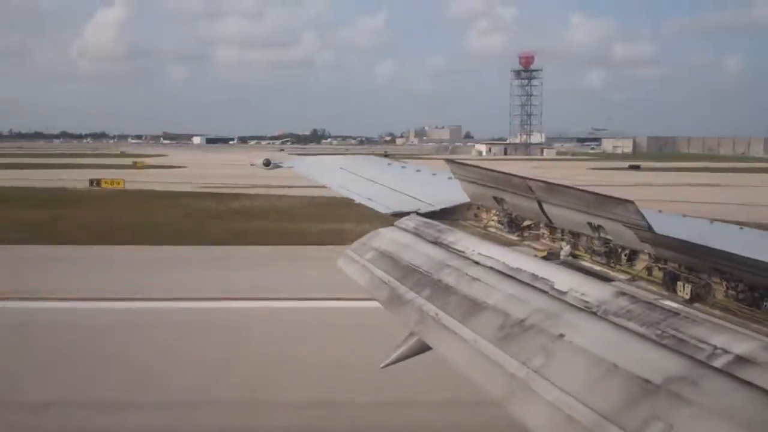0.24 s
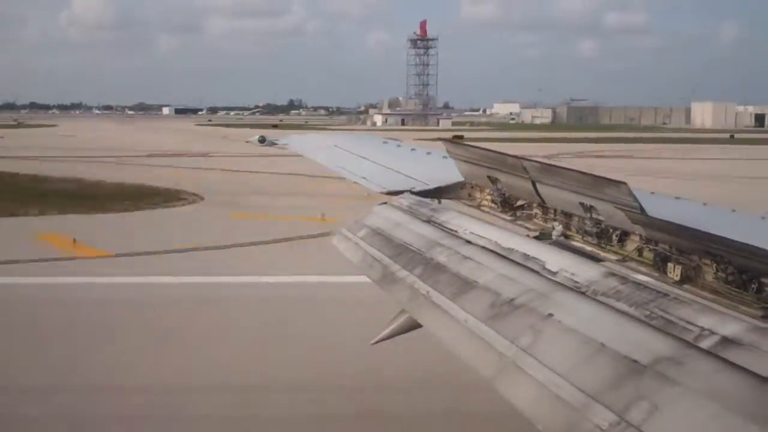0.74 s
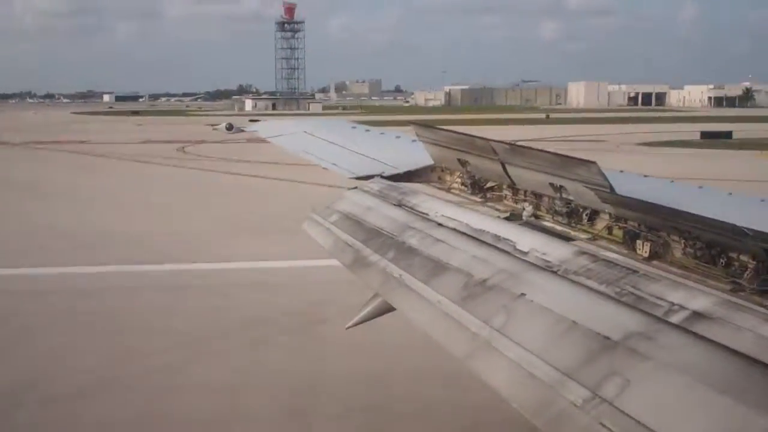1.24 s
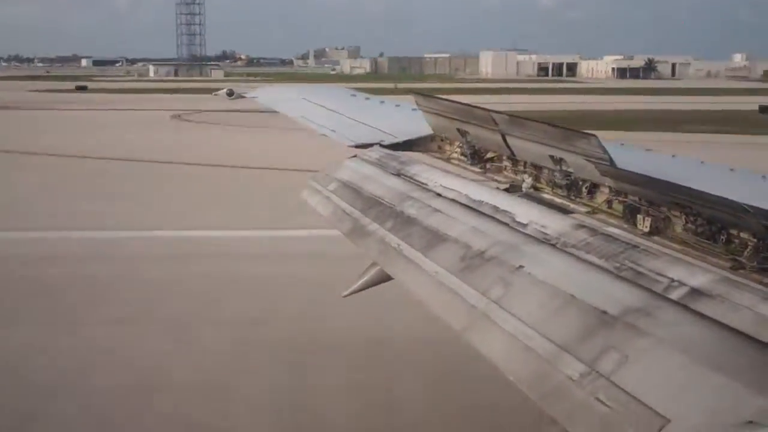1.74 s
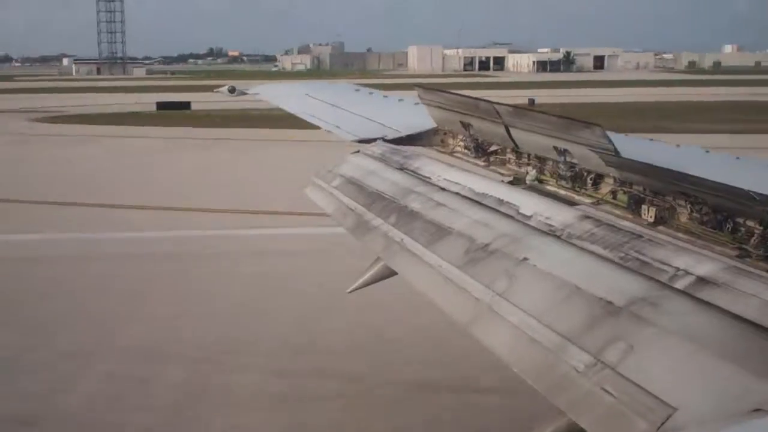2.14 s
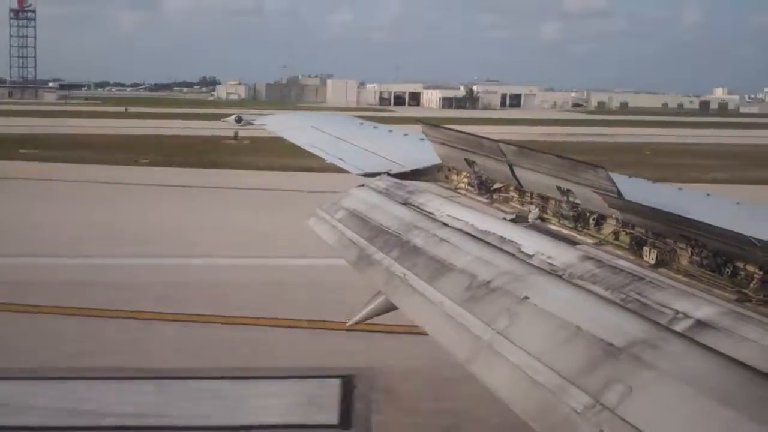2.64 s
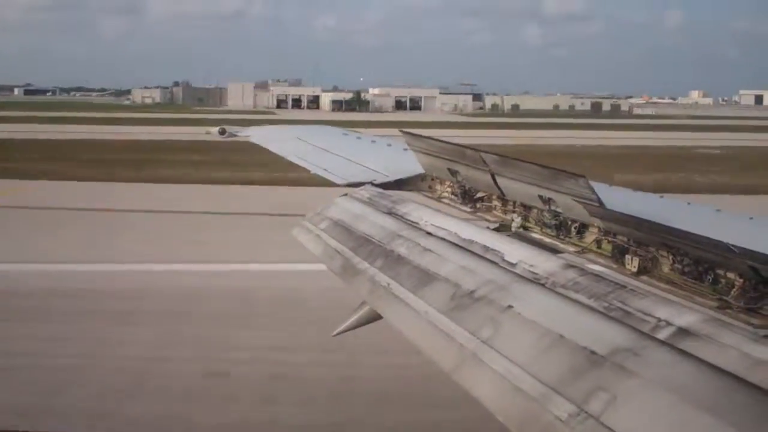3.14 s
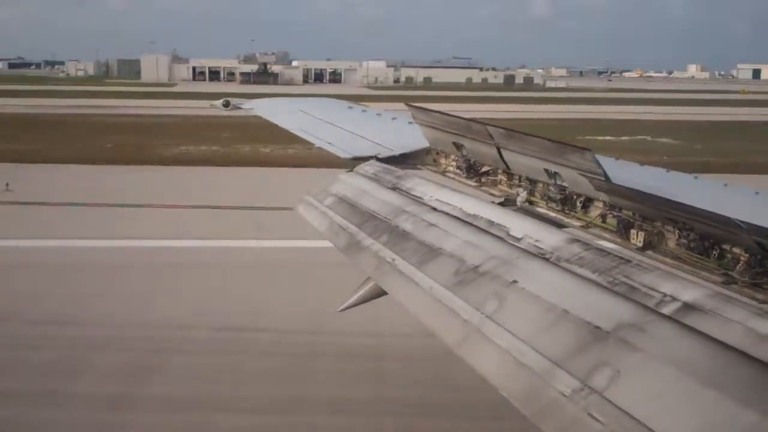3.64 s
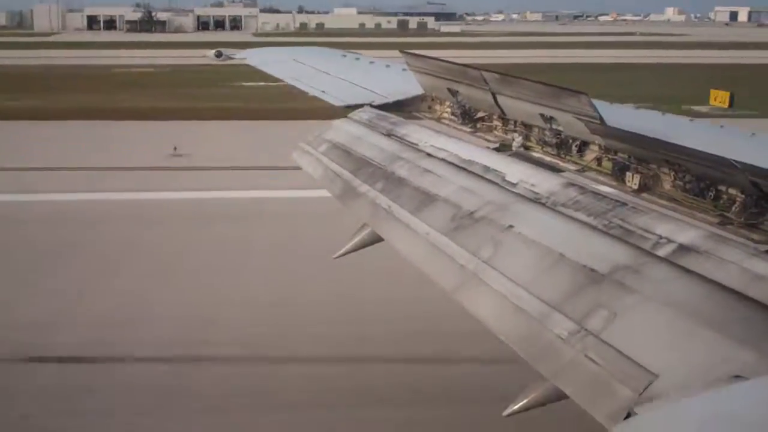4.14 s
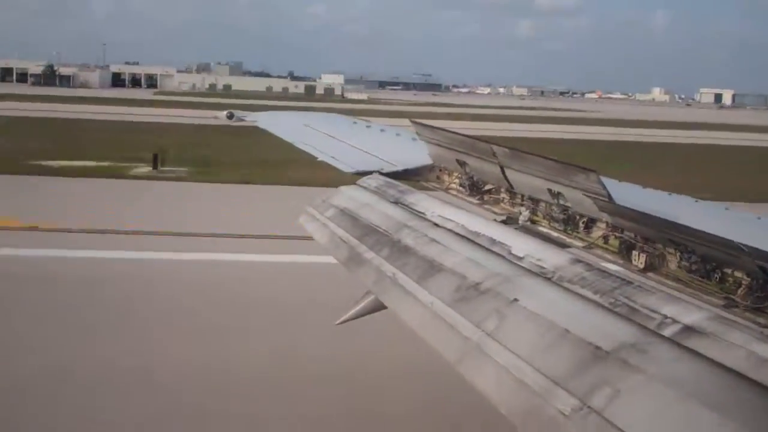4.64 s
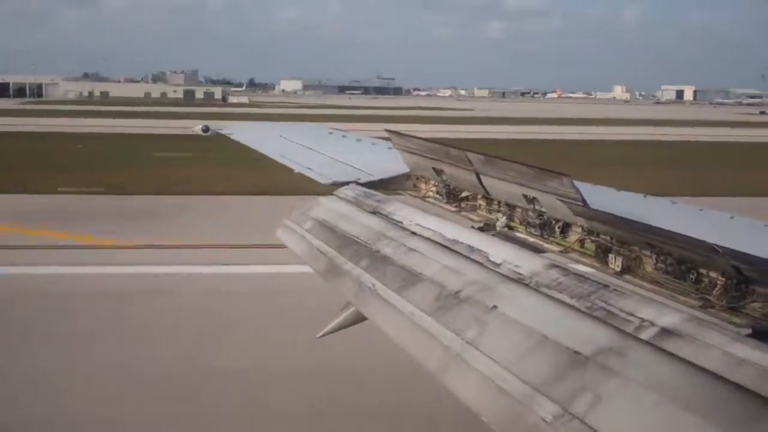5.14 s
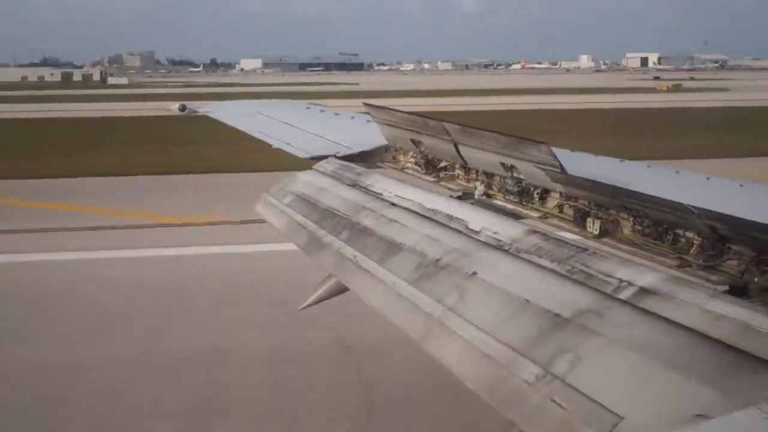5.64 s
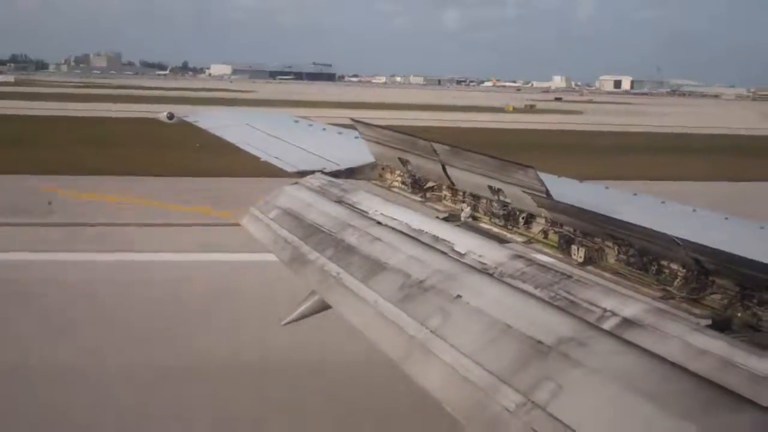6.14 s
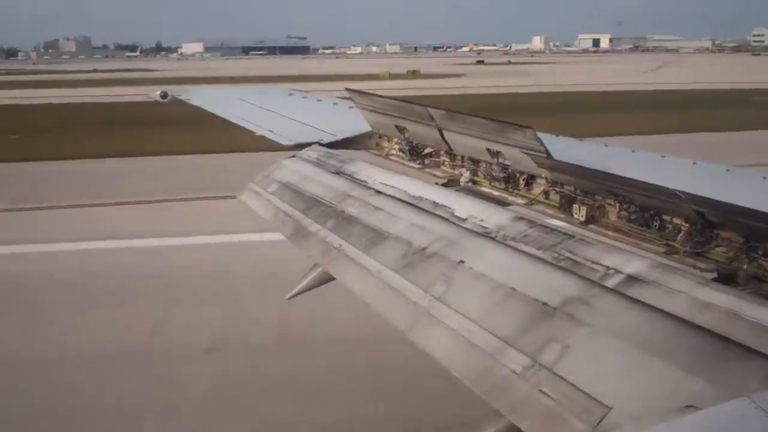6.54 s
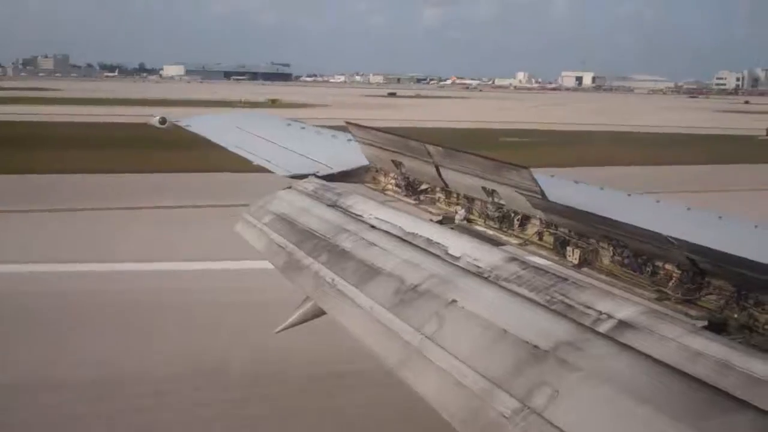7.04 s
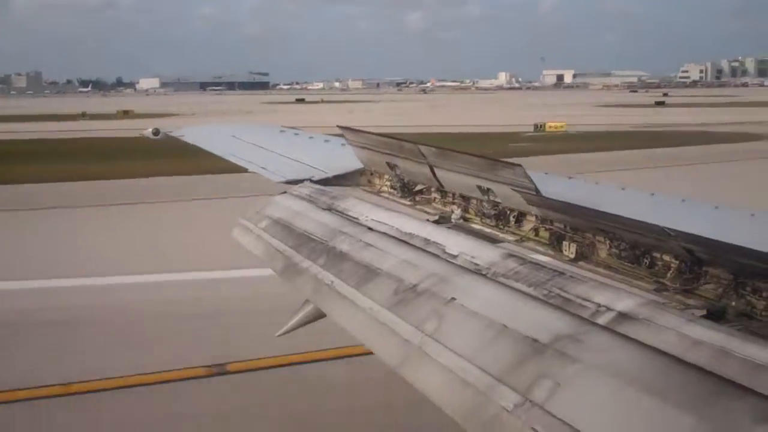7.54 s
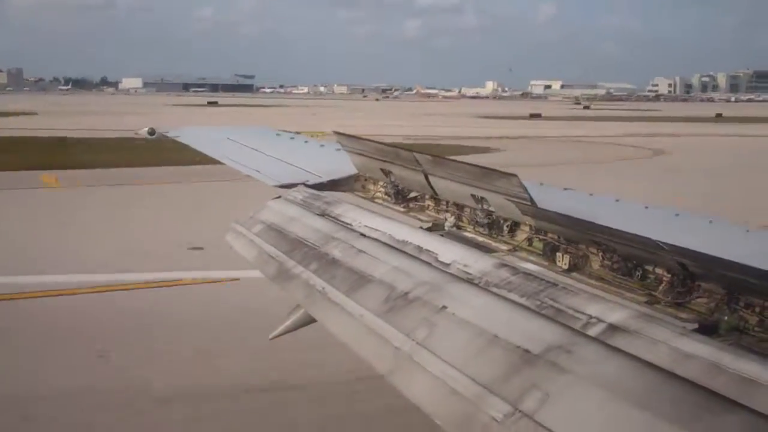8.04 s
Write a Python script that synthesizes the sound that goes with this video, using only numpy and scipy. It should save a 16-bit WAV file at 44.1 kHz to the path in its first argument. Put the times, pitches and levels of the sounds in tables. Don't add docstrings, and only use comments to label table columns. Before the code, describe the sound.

Dense, boomy airliner cabin roar grows from idle to full reverse thrust, with runway rumble, hollow wind howl, rushing air and small plastic ticks.

```python
import sys
import numpy as np
from scipy import signal
from scipy.fft import irfft, next_fast_len
from scipy.io import wavfile
from scipy.ndimage import uniform_filter1d, minimum_filter1d

SR = 44100
rng = np.random.default_rng(int(sys.argv[2]) if len(sys.argv) > 2 else 0)


def transcribe(signal):
    frames = np.atleast_2d(signal).T
    limited = np.clip(frames, -1, 1)
    pcm = np.round(limited * 32767).astype(np.int16)
    wavfile.write(sys.argv[1], SR, pcm)


def ratio(d):
    e = np.asarray(d, float) / 20
    return 10 ** e


N = 366030
HZ = np.fft.rfftfreq(next_fast_len(N), 1 / SR)
LOG_HZ = np.log(HZ + 1)

# (time [s], power [0 idle - 1 full])
POWER_CURVE = [(0, 0), (.7, 0.066), (1.3, 0.11), (1.8, 0.16), (2.3, 0.53), (2.7, 0.87), (3.2, 0.83),
               (3.6, 0.92), (4.2, 0.98), (4.7, 0.89), (5.1, 0.77), (5.6, 0.79), (6.1, 0.77), (6.6, 0.99),
               (7.2, 0.86), (7.7, 0.73), (8.3, 0.83)]
# (frequency [Hz], density [dB per Hz])
WALL_SPECTRUM = [(95, -26), (130, -9), (200, -6.5), (330, -8), (450, -13), (630, -21.5), (750, -29),
                 (950, -31.5), (1300, -62)]
# (frequency [Hz], width [Hz], lift [dB])
CABIN_MODES = [(138, 18, 0), (218.5, 44, 7), (287, 33.4, 4.5), (312, 37, 1), (395.4, 24.6, 8.5),
               (502.5, 8.9, 2), (621, 110, 2.5)]
# (time [s], length [s], boom lift [dB])
HULL_BUFFETS = [(1.55, 0.15, 4), (1.85, 0.065, 5.5), (2.3, 0.17, 1), (2.58, 0.057, 3.5), (3.15, 0.27, 2.5),
                (3.5, 0.22, 3.5), (4.05, 0.32, 1.5), (4.5, 0.58, 2.5), (5.2, 0.065, 3), (5.4, 0.093, 2),
                (5.9, 0.27, 1.5), (6.45, 0.22, 4), (7.35, 0.14, 2.5), (7.55, 0.11, 1)]
# (time [s], length [s], lift [dB])
ROAR_GUSTS = [(1.45, 0.19, -0.5), (1.75, .15, 1.5), (2.45, 0.18, 1), (3.2, 0.58, 1.5), (4, 0.085, 2),
              (4.75, 0.12, 3), (5.25, 0.26, 0.5), (5.45, 0.13, -0.5), (6.35, 0.22, -1), (7.08, .25, 1.5),
              (7.4, 0.14, -2.5), (7.88, 0.1, 1), (8.2, .15, 0.5)]
# (frequency [Hz], density [dB per Hz])
WHEEL_SPECTRUM = [(40, -31), (58, 1), (72, 8.5), (90, 12.5), (100, 12.5), (115, 5.5), (135, 5), (210, -97)]
# (frequency [Hz], density [dB per Hz])
SHUDDER_SPECTRUM = [(20, -19), (30, 2), (45, 7), (56, 12.5), (75, -1), (100, -34.5), (160, -90)]
# (time [s], length [s], rumble lift [dB])
RUNWAY_JOINTS = [(.1, .3, 2.5), (1.85, .08, 4.5), (2.1, 0.22, 1.5), (2.56, .1, 0), (2.87, 0.091, 1),
                 (3.15, .15, 3), (3.47, 0.14, 6.5), (5.25, 0.17, 5.5), (6.9, 0.55, 2), (7.5, 0.091, 2),
                 (7.79, 0.089, 1)]
# (frequency [Hz], width [Hz], level [dB])
CAVITY_MODES = [(804.6, 75, -1), (841, 55, -1.5), (865, 146, -12)]
# (time [s], length [s], lift [dB])
FLOW_LOCKS = [(.15, 0.44, 3), (1.2, 0.36, 4), (1.7, .1, -1.5), (2.5, 0.18, 1.5), (3.15, 0.18, 4.5),
              (3.5, .15, 3), (4.75, .15, 3), (6.35, 0.086, -0.5), (6.55, 0.43, 1), (7.4, 0.44, 0.5),
              (7.8, 0.086, 3)]
# (frequency [Hz], density [dB per Hz])
SKIN_SPECTRUM = [(850, -13.5), (950, -4.5), (1030, 2.5), (1150, 0), (1250, -8), (1500, -39)]
# (frequency [Hz], density [dB per Hz])
EXHAUST_SPECTRUM = [(1050, -6.5), (1280, 1.5), (1450, 2), (1550, 0), (1900, -8), (2600, -33), (4000, -45)]
# (time [s], length [s], lift [dB])
EXHAUST_SURGES = [
    (.05, 0.85, 4),
    (1.1, 0.5, 3.5),
    (2.35, 0.52, 2.5),
    (3.4, 0.5, 2),
    (4.5, 1.34, 4),
    (6.95, 0.86, 4),
    (8.2, 0.63, 1.5),
]
# (frequency [Hz], density [dB per Hz])
PANEL_SPECTRUM = [(1300, -21), (1900, 2.5), (2500, -0.5), (3300, -4.5), (4300, -11), (6000, -22.5),
                  (9000, -34)]
# (frequency [Hz], density [dB per Hz])
VENT_SPECTRUM = [(1760, -17), (3000, -3.5), (4210, -4.5), (4700, -3.5), (5980, -3.5), (13600, -11),
                 (14200, -9.5)]
# (time [s], length [s], lift [dB])
WALL_SHAKES = [(.45, 0.59, 2.5), (.9, .15, -1.5), (1.1, .15, 0.5), (1.3, .12, -1.5), (1.65, .2, -1.5),
               (2.25, 0.16, 0.5), (2.6, 0.62, -3), (3.3, 0.89, 1.5), (4.6, 0.25, 1.5), (5.5, .8, 0.5),
               (6.8, .5, -1), (7.6, .2, 1)]
# (time [s], peak level [dB], brightness [dB])
TRIM_TICKS = [(.0778, -23, 5), (.5984, -31, -2), (.6399, -34, 2), (.843, -31, 0), (1.0031, -28, -2),
              (2.153, -22, -3), (2.2169, -32, 6), (3.0844, -35, 0), (3.5217, -31, 2), (4.5231, -32, 4),
              (4.582, -36, 3), (5.108, -32, 5), (6.2973, -34, 6), (6.6762, -32, 3), (7.015, -32, 6),
              (7.0234, -35, 3), (7.281, -33, 5), (8.2195, -32, 5)]
# (time [s], peak level [dB], brightness [dB])
TRIM_SCUFFS = [(0.155, -33, -1), (0.3114, -36, -8), (0.3284, -35, -4), (0.3984, -36, -3), (0.4953, -35, 1),
               (0.5184, -37, -6), (0.5484, -40, -3), (0.7184, -36, -2), (1.3984, -38, -3),
               (1.4684, -38, -5), (1.7484, -38, -4), (2.1684, -32, -2), (2.2834, -38, 5), (2.3634, -45, 9),
               (2.4934, -33.5, 3), (3.3184, -35, 0), (4.583, -30, 4), (4.6884, -36, -4), (5.9284, -41, 1),
               (6.2784, -36, -3), (6.5834, -38, 6), (7.0884, -39, 3), (7.1034, -39, 4)]
TRIM_BAND_LEVELS = (-5, -5.5, -1.5)
# (start [s], end [s], level [dB])
WHINE_SPELLS = [(.68, .82, -61), (1.02, 1.2, -61), (2.05, 2.3, -61), (2.63, 2.73, -60), (5.28, 5.42, -64),
                (6.62, 6.8, -62), (7.68, 7.8, -64), (7.86, 8.0, -60)]
# (frequency [Hz], level [dB])
PORT_APART = [(60, -29), (200, -31), (370, -23), (670, -14), (1230, -9), (2250, -1), (3500, 0), (14000, 0)]
# (frequency [Hz], difference [dB])
PORT_LEAN = [(60, .5), (370, .3), (700, 1.1), (1300, .2), (2500, 1.6), (5000, 2.8), (9000, 3.6),
             (13500, 5.6)]

# [dB, dB]
BOOM, ROAR, RUMBLE, HOWL = (-19, -12), (-19.5, -14), (-25.5, -23.5), (-31.5, -28.5)
RUSH, EXHAUST, BUZZ, HISS = (-39.5, -36.5), (-46, -42.5), (-55, -49), (-52.5, -46.5)
WHEEL_TRIM_DB, SHUDDER_DB = -0.7, -30.5
BRAKE_ON_S, BRAKE_OFF_S, BRAKE_RAMP_S, BRAKE_DB = 3.45, 5.4, 0.19, 2.5
SURGE_SHARE_IN_RUSH = 0.49
TICK_DB, TICK_RISE_S, TICK_RING_S = -5.5 - 1.0, 0.0025, 0.039
SCUFF_DB, SCUFF_RISE_S, SCUFF_RING_S = -6, 0.006, 0.13
WHINE_HZ = 10442
CEILING, TOP_HZ = 1.008, 14060


def on_hz(table):
    hz, value = np.transpose(table)
    return np.interp(LOG_HZ, np.log(hz), value)


def on_time(table):
    s, *columns = np.transpose(table)
    return [np.interp(np.arange(N) / SR, s, column) for column in columns]


def swells(rows):
    t = np.arange(N) / SR
    return sum(db * np.exp(-(2 * (t - s) / length) ** 2) for s, length, db in rows)


def walk(rate):
    hold = int(SR / rate)
    steps = np.repeat(rng.standard_normal(N // hold + 1), hold)
    return 0.77 * uniform_filter1d(uniform_filter1d(steps, hold), hold)[:N]


def peak(hz, width):
    return 1 / np.sqrt(1 + (2 * (HZ - hz) / width) ** 2)


def at_ports(gain):
    real, imaginary = rng.standard_normal((2, 2, len(HZ)))
    mid, side = (real + 1j * imaginary) * gain
    side = side * ratio(on_hz(PORT_APART))
    lean = ratio(on_hz(PORT_LEAN) / 2)
    pair = irfft(np.array([(mid + side) * lean, (mid - side) / lean]))[:, :N]
    return pair / np.std(pair.mean(axis=0))


def steadied(pair, share, seconds):
    swell = uniform_filter1d(pair.mean(axis=0) ** 2, int(seconds * SR)) + 1e-3
    out = pair / swell ** (np.clip(share, 0, 1) / 2)
    return out / np.std(out.mean(axis=0))


def thrust(boom_db, roar_db):
    modes_db = sum(lift * peak(hz, width) ** 2 for hz, width, lift in CABIN_MODES)
    colour = ratio(on_hz(WALL_SPECTRUM) + modes_db)
    low = 1 / np.sqrt(1 + (HZ / 252) ** 24)
    high = np.sqrt(1 - low ** 2)
    boom = steadied(at_ports(colour * low), share=0.31, seconds=0.18)
    roar = steadied(at_ports(colour * high), share=0.54, seconds=0.14)
    return ratio(boom_db) * boom + ratio(roar_db) * roar


def wheels(db):
    roll = steadied(at_ports(ratio(on_hz(WHEEL_SPECTRUM))), share=0.24, seconds=0.082)
    shudder = steadied(at_ports(ratio(on_hz(SHUDDER_SPECTRUM))), share=0.4, seconds=0.22)
    return ratio(db + WHEEL_TRIM_DB) * roll + ratio(SHUDDER_DB) * shudder


def cavity(db):
    gain = sum(ratio(top) * peak(hz, width) ** 3 for hz, width, top in CAVITY_MODES)
    return ratio(db) * steadied(at_ports(gain), share=0.38, seconds=0.15)


def skin_flow(db):
    return ratio(db + 0.5 * walk(7)) * at_ports(ratio(on_hz(SKIN_SPECTRUM)))


def exhaust(db):
    return ratio(db + 1.9 + 0.85 * walk(5.6)) * at_ports(ratio(on_hz(EXHAUST_SPECTRUM)))


def panels(db):
    return ratio(db + 1.5 + 1.3 * walk(8.5)) * at_ports(ratio(on_hz(PANEL_SPECTRUM)))


def vents(db):
    return ratio(db + 0.7 * walk(21)) * at_ports(ratio(on_hz(VENT_SPECTRUM)))


def knocks(rows, rise):
    out, t = np.zeros(N + SR), np.arange(SR // 8) / SR
    for s, db, ring in rows:
        i = int(s * SR)
        decay = np.exp(-np.log(1000) * t / max(ring, 0.004))
        out[i:i + len(t)] += ratio(db) * (1 - np.exp(-t / rise)) * decay
    return out[:N]


def trim():
    bands = [at_ports(peak(hz, width) ** 4) for hz, width in [(3000, 6700), (6300, 5200), (11800, 16000)]]
    kinds = [(TRIM_TICKS, TICK_DB, TICK_RISE_S, TICK_RING_S),
             (TRIM_SCUFFS, SCUFF_DB, SCUFF_RISE_S, SCUFF_RING_S)]
    out = 0
    for table, lift_db, rise, ring in kinds:
        for tilt, band_db, band in zip((-1, 0, 1), TRIM_BAND_LEVELS, bands):
            blows = [(s, db + lift_db + band_db + tilt * bright, ring) for s, db, bright in table]
            out = out + band * knocks(blows, rise)
    return out


def whine():
    t = np.arange(N) / SR
    gates = sum(ratio(db) * (t > start) * (t < end) for start, end, db in WHINE_SPELLS)
    level = uniform_filter1d(gates, size=900) * ratio(2.5 * walk(20))
    phase = 2 * np.pi * np.cumsum(WHINE_HZ + 6 * walk(20)) / SR
    return level * np.sin(phase) * ratio(np.array([[4], [-6]]))


def scene():
    t = np.arange(N) / SR
    power, = on_time(POWER_CURVE)

    def follow(layer):
        idle_db, full_db = layer
        return idle_db + (full_db - idle_db) * power

    surge = swells(EXHAUST_SURGES)
    shake = swells(WALL_SHAKES) + 0.85 * walk(14)
    braking = uniform_filter1d(1.0 * (t > BRAKE_ON_S) * (t < BRAKE_OFF_S), int(BRAKE_RAMP_S * SR))
    boom_db = follow(BOOM) + swells(HULL_BUFFETS) + 0.75 * walk(9)
    roar_db = follow(ROAR) + swells(ROAR_GUSTS) + 0.51 * walk(8.7)
    rumble_db = follow(RUMBLE) + BRAKE_DB * braking + swells(RUNWAY_JOINTS) + 0.73 * walk(9)
    howl_db = follow(HOWL) + swells(FLOW_LOCKS) + 1.3 * walk(9)

    mix = thrust(boom_db, roar_db) + wheels(rumble_db) + cavity(howl_db)
    mix = mix + skin_flow(follow(RUSH) + SURGE_SHARE_IN_RUSH * surge)
    mix = mix + exhaust(follow(EXHAUST) - 1.5 + surge)
    mix = mix + panels(follow(BUZZ) + shake) + vents(follow(HISS) + shake)
    return mix + trim() + whine()


def top_cut(x):
    return signal.sosfilt(signal.butter(12, 14350, fs=SR, output="sos"), x)


def record(dry):
    thin = signal.sosfilt(signal.butter(3, 34, "high", fs=SR, output="sos"), dry)
    need = CEILING / np.maximum(np.abs(thin).max(axis=0), CEILING)
    gain = uniform_filter1d(minimum_filter1d(need, size=121), size=121)
    dull = signal.sosfilt(signal.ellip(10, 0.2, 80, TOP_HZ, fs=SR, output="sos"), thin * gain)
    return top_cut(dull)


dry = scene()
out = record(dry)
transcribe(out)
```